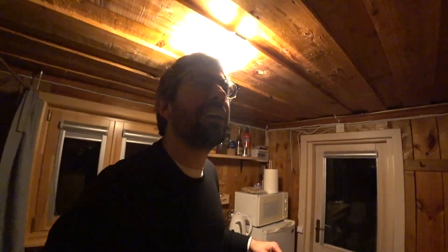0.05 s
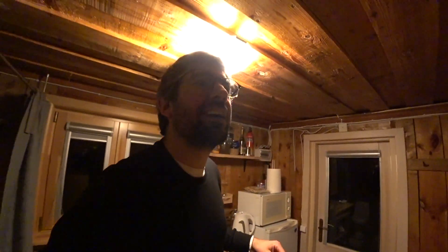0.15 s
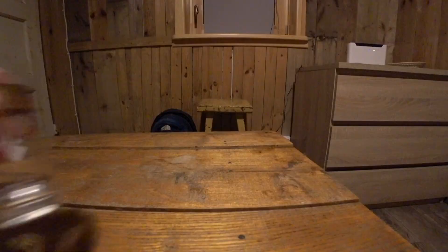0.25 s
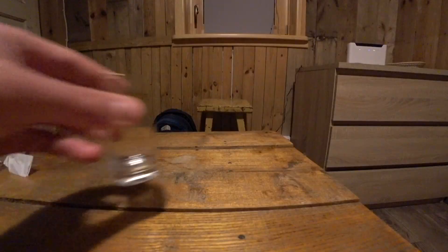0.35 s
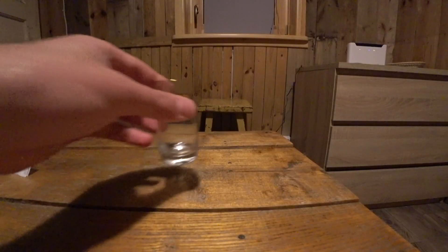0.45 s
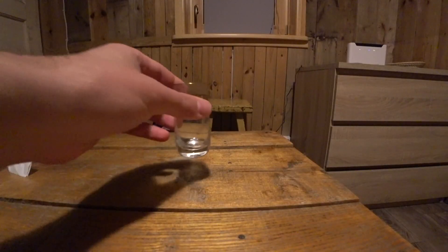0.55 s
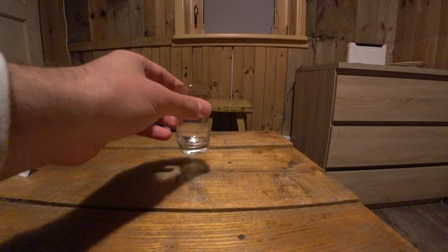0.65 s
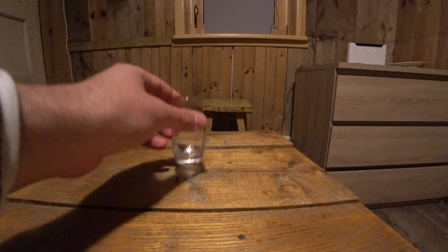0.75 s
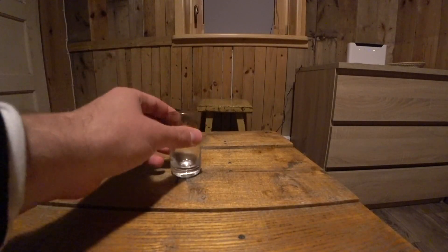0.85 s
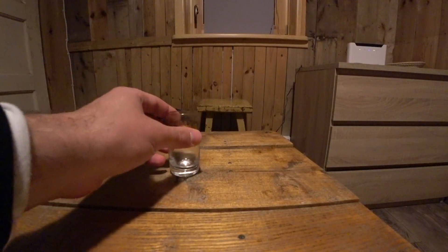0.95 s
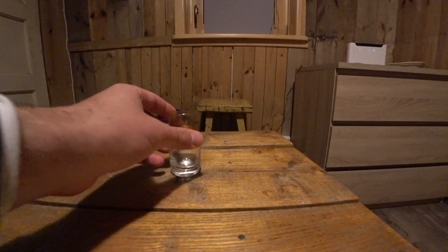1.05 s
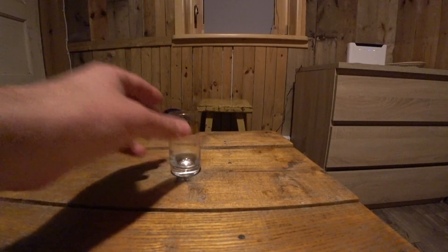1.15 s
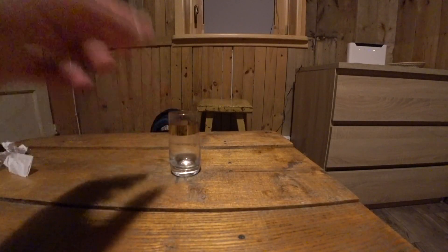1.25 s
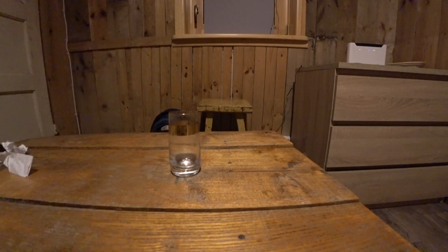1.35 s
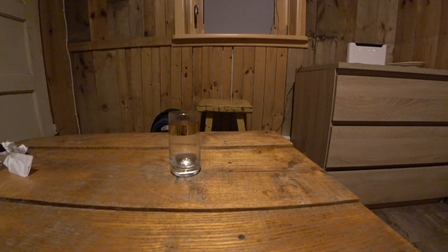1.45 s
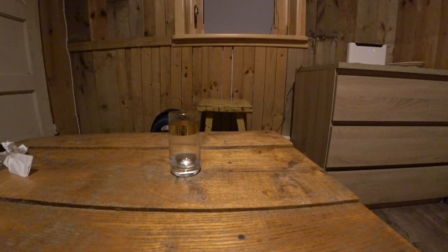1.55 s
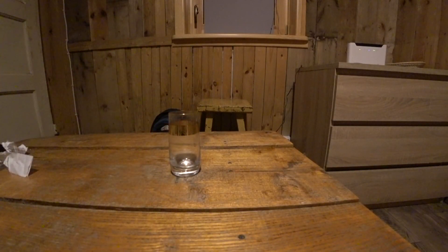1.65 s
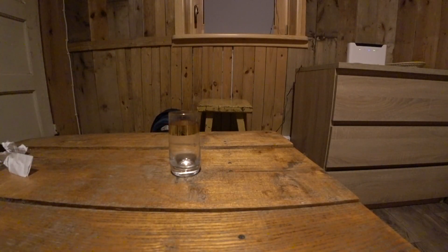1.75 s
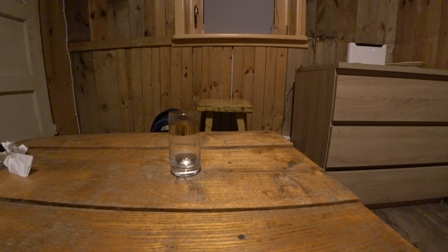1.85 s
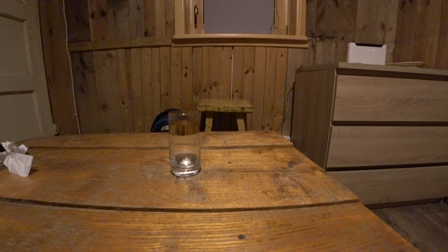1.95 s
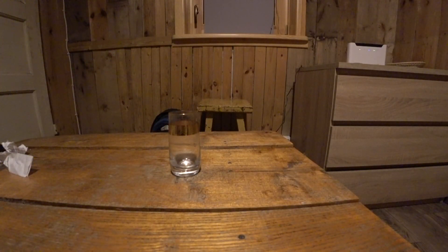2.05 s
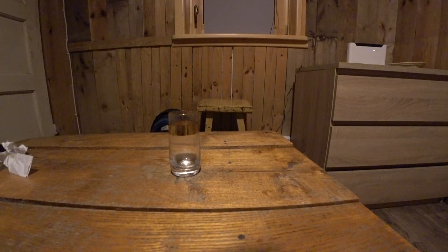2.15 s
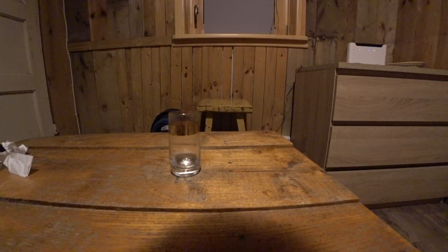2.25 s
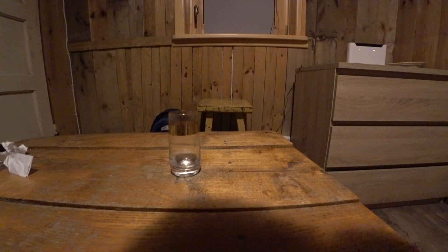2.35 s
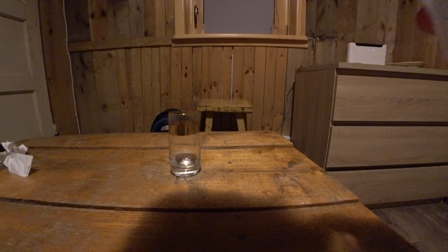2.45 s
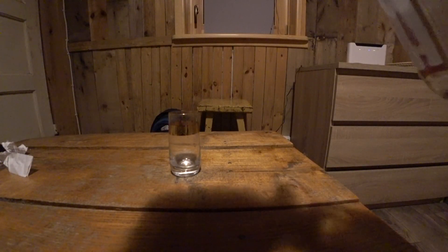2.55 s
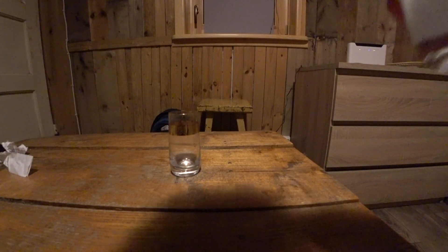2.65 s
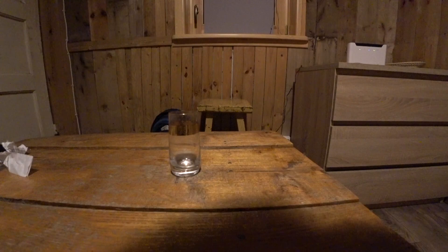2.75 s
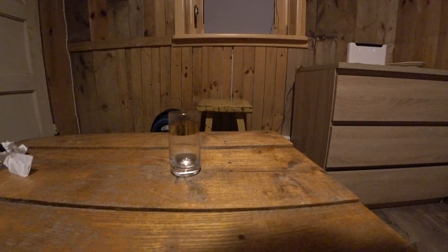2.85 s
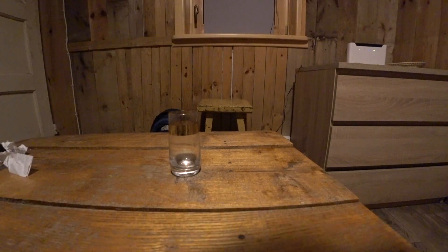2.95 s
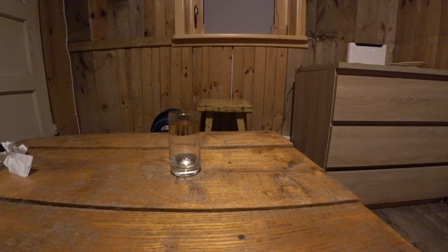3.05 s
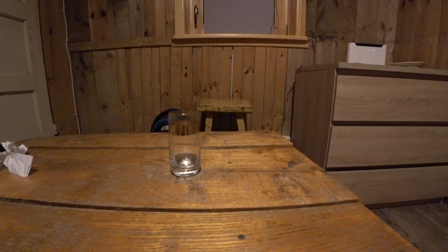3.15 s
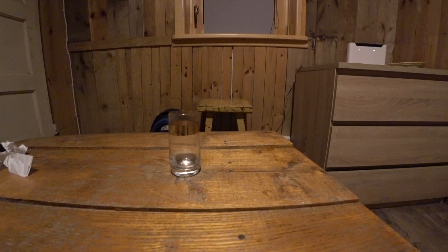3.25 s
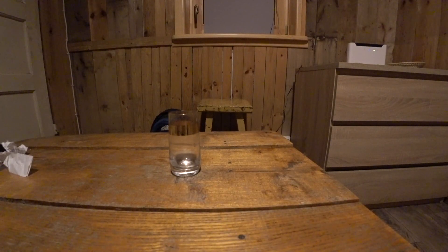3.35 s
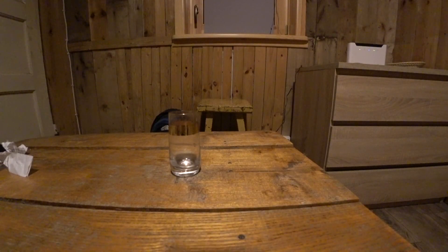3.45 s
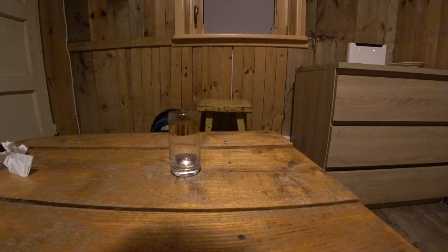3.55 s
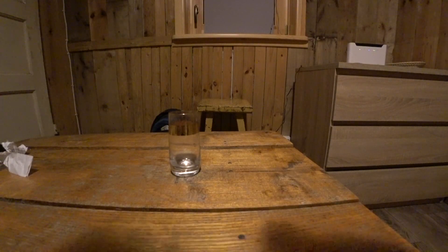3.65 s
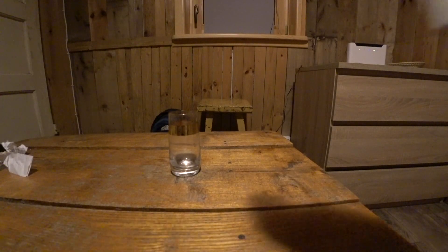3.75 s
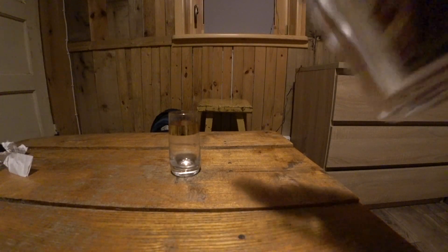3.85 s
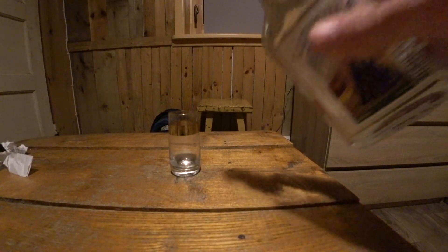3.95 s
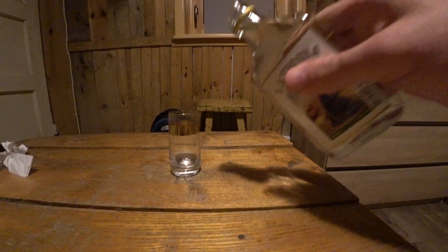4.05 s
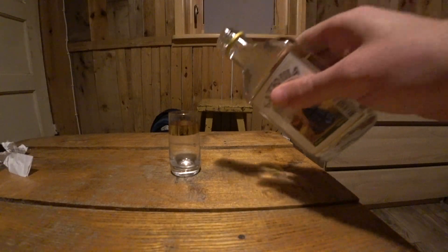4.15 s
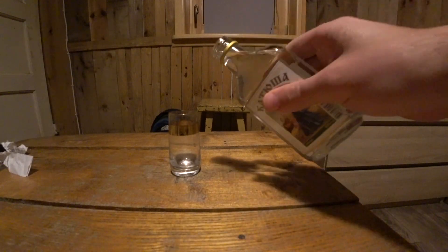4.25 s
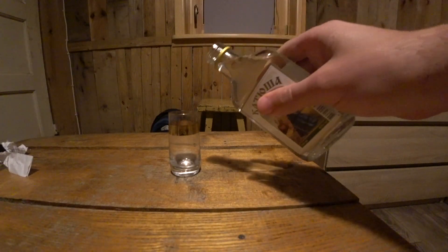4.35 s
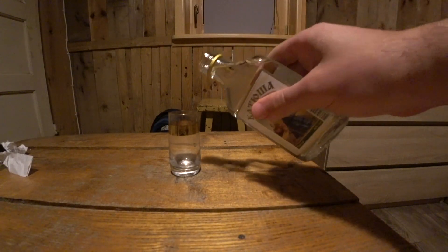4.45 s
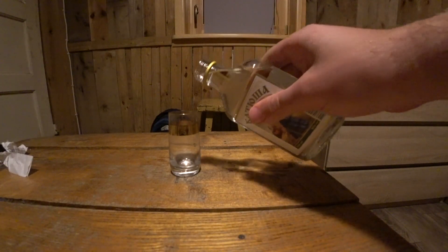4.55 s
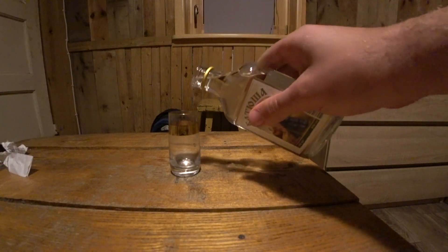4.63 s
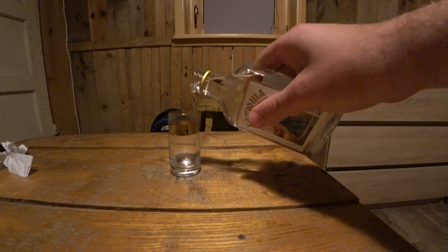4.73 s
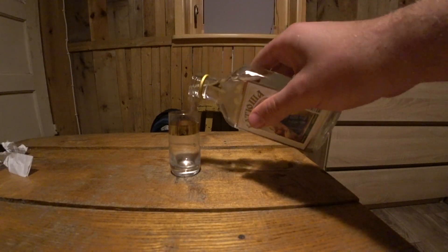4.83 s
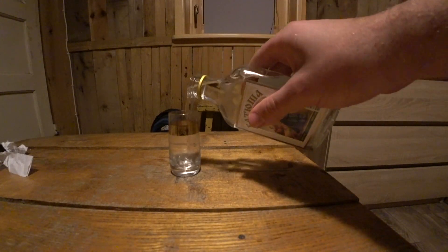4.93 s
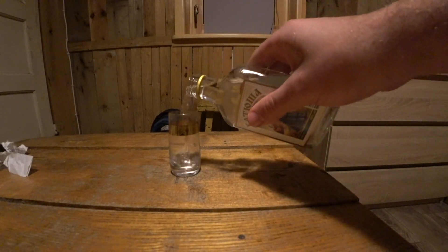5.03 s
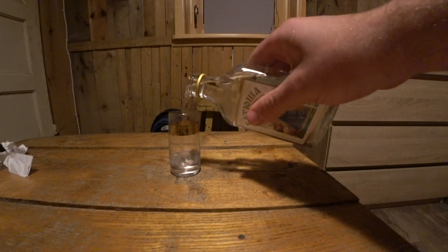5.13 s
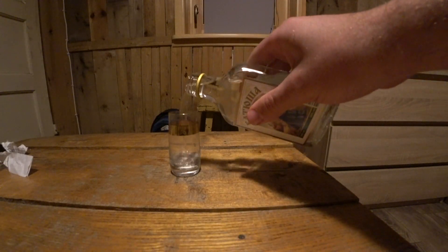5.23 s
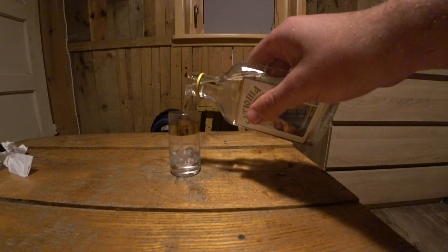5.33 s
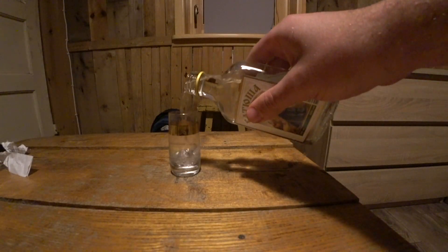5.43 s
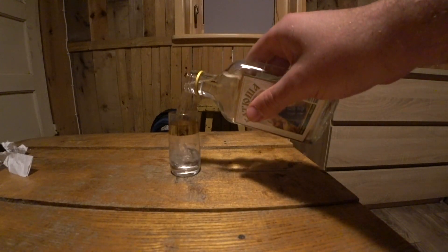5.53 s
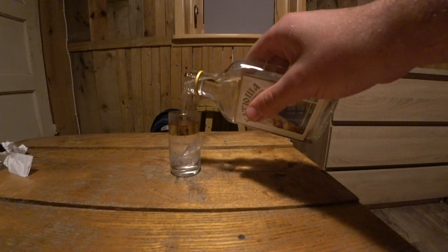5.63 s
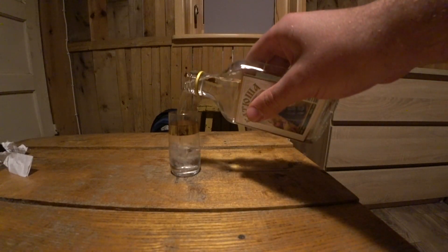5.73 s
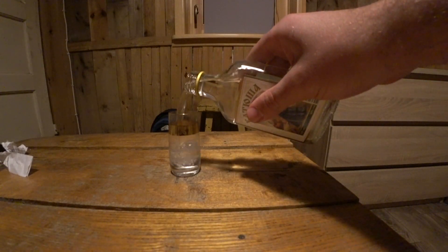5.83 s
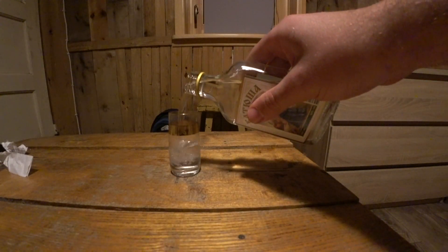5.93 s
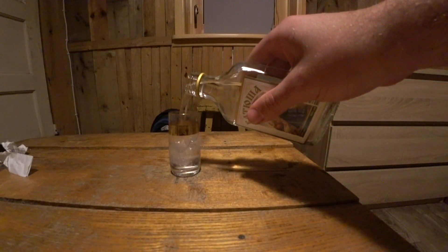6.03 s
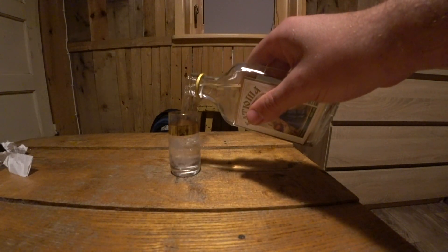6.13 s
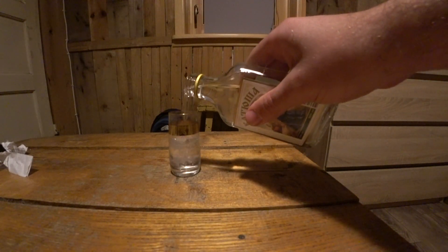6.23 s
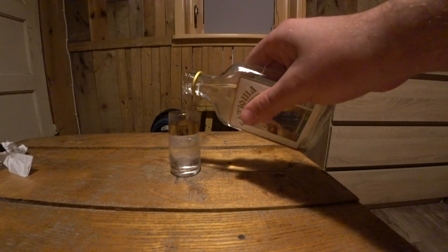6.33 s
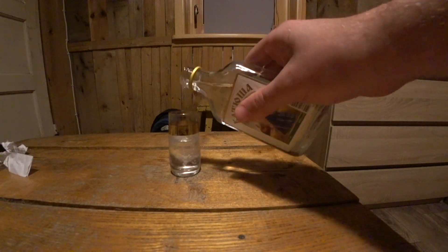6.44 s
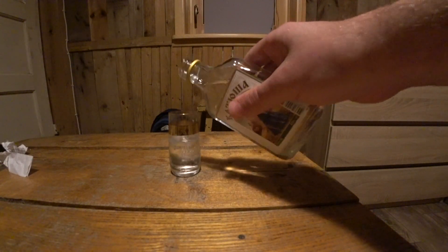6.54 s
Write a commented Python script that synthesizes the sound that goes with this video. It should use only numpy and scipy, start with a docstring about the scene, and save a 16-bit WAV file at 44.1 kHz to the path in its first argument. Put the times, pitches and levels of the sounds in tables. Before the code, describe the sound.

A sharp woody thump of glass on table, then faint bumps and quiet. Small metallic ticks lead to a bright crackling snap as a bottle cap's seal breaks, followed by gritty thread rubs and a hollow pop as it comes free. After a pause, round glugs accompany spurting, fizzy liquid in a small glass, ending in a few drips. Near microphone, short wooden room reflections, faint hush.

```python
"""A quarter second of louder, duller tone from another place is cut off; then, in a quiet panelled room, a small glass is
set on a wooden table: planks ring as decaying sines over noise, and the glass wall sings. A screw cap rubs, cracks its
seal and is twisted off: noise in metal, thread and neck resonances. The bottle gulps air, each gulp a hum that sweeps up,
and spurts of drink fall into the glass as bubble tones and noise in an air column that rises in pitch. The walls answer
cap, gulps and drink."""
import sys
import numpy as np
from scipy import signal
from scipy.fft import rfft, irfft, next_fast_len
from scipy.io import wavfile
from scipy.ndimage import uniform_filter1d, map_coordinates

SR = 44100
rng = np.random.default_rng(int(sys.argv[2]) if len(sys.argv) > 2 else 0)


def wav_record(signal):
    """Record a signal, one row per channel, as 16-bit PCM in the file named by sys.argv[1]."""
    frames = np.transpose(np.atleast_2d(signal))
    bounded = np.clip(frames, -1, 1)
    # unit amplitude maps onto the largest positive 16-bit level
    quanta = np.round(bounded * 32767).astype(np.int16)
    wavfile.write(sys.argv[1], SR, quanta)


N = 290525

# low modes of the cap's thin shell: f/Hz, width/Hz, relative level/dB
SHELL_MODES = [(1730, 720, 8), (2232, 560, 16)]
# modes of the rubbing thread: f/Hz, width/Hz, relative level/dB
THREAD_MODES = [(3290, 160, -4.5), (4000, 200, 2), (5380, 280, -7), (6280, 300, -7.5), (7800, 47, -4.5),
                (10356, 2900, -19)]
# strokes of the cap on its thread: start/s, length/s, low modes level/dB, thread level/dB, hollow level/dB
STROKES = [(1.853, .14, -82.5, -73, -98), (2.026, 0.23, -71.5, -68.5, -100), (2.29, 0.017, -60, -51.5, -95),
           (2.511, .05, -55.5, -59.5, -95), (2.6, 0.0618, -53.5, -58, -95),
           (2.713, 0.019, -65.5, -59, -105), (2.893, .04, -71.5, -61, -101.5),
           (2.977, 0.029, -59.5, -52, -65.5), (3.031, 0.0063, -44.5, -45, -60.5),
           (3.086, .01, -76, -73.5, -58.5), (3.212, 0.037, -69, -70, -63), (3.313, 0.05, -55, -56.5, -56),
           (3.385, .015, -67, -63.5, -52), (3.42, .01, -59, -56, -52), (3.429, 0.0052, -56.5, -46.5, -49),
           (3.465, 0.0088, -76.5, -73, -68)]
GRIP_S, SLIP_S = 0.004, 0.018  # a stroke takes this long to gain and to lose 10 dB


def landings():
    """Lumps of drink ring the air column as damped bubble tones; small drops click higher up, with a splat of noise."""
    # lumps landing in the glass: t/s, level/dB, f/Hz
    plops = [(5.086, -41, 1276), (5.256, -35, 1252), (5.295, -41.5, 1250), (5.305, -35, 1193),
             (5.321, -26.5, 1272), (5.354, -43, 1030), (5.412, -34.5, 1370), (5.441, -22, 1367),
             (5.48, -37, 1210), (5.502, -33.5, 1285), (5.526, -36, 1220), (5.547, -31, 1280),
             (5.597, -36, 984), (5.649, -45, 1800), (5.665, -29.5, 1446), (5.7, -26.5, 1414),
             (5.734, -33, 1400), (5.79, -37, 1630), (5.802, -34.5, 1360), (5.824, -34, 1403),
             (5.938, -36.5, 1580), (5.958, -36, 1530), (6.014, -37.5, 1640), (6.044, -38, 1590),
             (6.172, -58, 1730), (6.186, -45, 1760), (6.526, -46, 1790), (6.576, -41.5, 1840)]
    # small bubbles and drops: t/s, level/dB, f/Hz
    drops = [(4.089, -48, 3080), (4.576, -44, 3660), (4.773, -47, 3950), (4.945, -47.5, 3760),
             (4.974, -35, 5700), (4.984, -48, 5900), (5.0856, -48.5, 6800), (5.1254, -34, 3880),
             (5.1895, -38, 4060), (5.256, -38.5, 4130), (5.3109, -48, 4100), (5.316, -29.5, 3930),
             (5.3689, -41.5, 4400), (5.3916, -40.5, 4100), (5.415, -44, 3980), (5.4397, -38, 4000),
             (5.5204, -47, 5570), (5.535, -39.5, 4200), (5.5666, -32.5, 5740), (5.5782, -24.5, 4190),
             (5.632, -28.5, 4180), (5.6499, -36, 4310), (5.698, -40, 4370), (5.7698, -43, 4830),
             (5.791, -35.5, 4740), (5.8155, -31, 5920), (5.8703, -34, 4270), (5.9013, -38, 7700),
             (5.924, -26.5, 5340), (6.127, -48, 4100), (6.201, -41.5, 7740), (6.367, -37.5, 5570),
             (6.574, -42.5, 4630)]
    out, t = np.zeros(N), np.arange(300) / SR
    for s, db, hz in plops:
        add(out, s, amp(db + 0.5) * blip(hz, cycles=5.7, rise=0.0076, onset=9.5))
    for s, db, hz in drops:
        add(out, s, amp(db - 1.0) * blip(hz, cycles=9.2, rise=0.013))
        bright_noise = np.diff(rng.standard_normal(len(t) + 2), 2)
        add(out, s, amp(db - 14 - 60 * t / .006) * bright_noise)
    return out


def squeak():
    """A tiny bubble leaves the lip: a short sine that glides upward."""
    # one bubble: t/s, level/dB, from f/Hz, to f/Hz, length/s
    lip_bubble = (4.969, -38, 3500, 8600, .01)
    out = np.zeros(N)
    s, db, low_hz, top_hz, length = lip_bubble
    u = np.arange(round(length * SR)) / SR / length
    cycles = length * u * (low_hz + (top_hz - low_hz) * u / 2)
    add(out, s, amp(db) * np.sin(np.pi * u) * np.sin(2 * np.pi * cycles))
    return out


def fizzing():
    """Fizz is a spray of very short bubble tones over fine hiss, coloured and held at an even slow level."""
    # colour of the fizz: f/Hz, relative level/dB
    fizz_colour = [(1800, 3), (3200, -11.5), (4200, -4), (6000, -1), (9000, -3), (11500, 1.5)]
    mist = .3  # hiss rms beside a spray of rms 1
    spray = np.zeros(N)
    draws = rng.random(1600), rng.exponential(size=1600), *rng.standard_normal((2, 1600))
    for u, size, spread, life in zip(*draws):
        hz = min(6000 * np.exp(.4 * spread), 11000)
        add(spray, 4.9 + 1.7 * u, amp(4 * size) * blip(hz, cycles=2 * np.exp(.7 * life), rise=.05))
    raw = unit(spray) + mist * rng.standard_normal(N)
    fizz = filtered(raw, lambda f: amp(along(fizz_colour, f)))
    # level it, so that the spurts alone set the slow level
    return fizz / (np.sqrt(np.abs(uniform_filter1d(fizz ** 2, size=4000))) + 1e-9)


def spurts():
    """Each spurt gurgles in the shortening air column, fizzes, drums the table and stirs the wet glass wall."""
    # spurts of drink: start/s, length/s, air column level/dB, fizz level/dB, table level/dB
    spurt_rows = [(4.973, 0.0105, -68, -58, -63), (5.105, 0.0046, -63, -62.5, -76),
                  (5.13, 0.028, -67, -50, -75), (5.17, 0.012, -71, -60, -69),
                  (5.261, 0.0033, -53, -51, -66), (5.283, 0.03, -60, -70, -64),
                  (5.321, 0.0105, -47, -48.5, -59.5), (5.441, 0.0073, -42.5, -49, -54),
                  (5.495, 0.032, -52, -64, -64), (5.556, 0.013, -56, -50.5, -59),
                  (5.593, 0.0079, -53.5, -70.5, -57.5), (5.662, 0.009, -65, -47.5, -48),
                  (5.716, 0.055, -49, -60.5, -56), (5.811, 0.0054, -47.5, -51, -45),
                  (5.894, 0.013, -53, -48.5, -58), (5.927, 0.022, -51.5, -55, -53),
                  (5.97, 0.049, -54.5, -66, -61.5), (6.03, 0.024, -56, -64.5, -62),
                  (6.178, 0.042, -58.5, -71, -67.5), (6.256, .012, -53, -61, -57.5),
                  (6.521, 0.0062, -67, -66, -61.5), (6.585, .01, -54, -72, -57.5)]
    # time to gain 10 dB: air column/s, fizz/s, table/s
    gush_s = (0.013, 0.011, 0.0071)
    # time to lose 10 dB: air column/s, fizz/s, table/s
    drain_s = (0.051, .02, 0.047)
    # the air column shortens: t/s, f/Hz
    column_pitch = [(4.95, 1145), (5.3, 1238), (5.7, 1450), (6.0, 1640), (6.3, 1843), (6.59, 1850)]
    # the planks under the stream: f/Hz, width/Hz, relative level/dB for each of two passes
    plank_modes = [(497.8, 63, 0.5), (648, 60, 1), (830, 115, -1.5)]
    wall_hz, load_hz_per_s = 3560, 70  # wall pitch at 0 s, and its fall as the drink loads it
    s, length, *dbs = np.transpose(spurt_rows)
    gurgle, hiss, drum = (swells(s, length, *row) for row in zip(dbs, gush_s, drain_s))
    hz = glide(column_pitch)
    fizz = fizzing()
    rumble = lumps(80, 3) * rng.standard_normal(N)
    planks = unit(filtered(rumble, lambda f: modes(plank_modes)(f) ** 2))
    column = amp(-3) * gurgle * moving(hz, 280, lumps(110, 4.5))
    overtone = amp(-8) * hiss * moving(3.15 * hz, 300, lumps(70, 4))
    wall = moving(wall_hz - load_hz_per_s * np.arange(N) / SR, 30, 1)
    sung = amp(-18) * uniform_filter1d(gurgle, size=6000) * wall
    return column + overtone + hiss * fizz + drum * planks + sung


def pour():
    """Drink falls into the glass: bubble tones of lumps and drops, one squeak at the lip, and the noisy spurts."""
    return landings() + squeak() + spurts()


def gulps():
    """The neck opens with a pop; the entering bubble hums low, then sweeps up as it pinches off."""
    # air gulps: start/s, pinch-off t/s, hum f/Hz, top f/Hz, hum level/dB, peak level/dB, pop level/dB
    gulp_rows = [(4.089, 4.226, 172, 605, -63, -56.5, -56), (4.577, 4.757, 114.4, 501, -61, -47, -46.5),
                 (4.777, 4.946, 94.4, 578, -63, -36.5, -47), (4.969, 5.15, 81.2, 478, -62, -31.5, -42),
                 (5.18, 5.358, 69.4, 465, -64, -31, -46), (5.459, 5.59, 57.8, 399, -63, -36.5, -90)]
    settle, settle_s, jolt_db = 0.15, 0.01, 13.5  # starts sharp (log pitch) and louder, then settles
    creep_per_s = 1.23  # slow climb in log pitch
    sweep_lead_s, sweep_s = 0.0189, 0.012  # the sweep's middle before the peak, and its width
    swell_s, pinch_s = 0.015, 0.0087  # the peak gains and loses 10 dB in these times
    out, t = np.zeros(N), np.arange(600) / SR
    pop = (1 - t / 0.00067) * np.exp(-t / 0.00051) * (1 - np.exp(-t / 0.00045))
    for s, pinch, hum_hz, top_hz, hum_db, peak_db, pop_db in gulp_rows:
        u = np.arange(round((pinch - s + .06) * SR)) / SR
        late = u - (pinch - s)  # seconds after pinch-off
        sweep = 1 / (1 + np.exp(-(late + sweep_lead_s) / sweep_s))
        low = np.log(hum_hz) + settle * np.exp(-u / settle_s) + creep_per_s * u
        hz = np.exp(low + sweep * (np.log(top_hz) - low))
        hum = amp(hum_db + jolt_db * np.exp(-u / settle_s / 2) - 10 * np.maximum(late, 0) / pinch_s)
        peak = amp(peak_db - 10 * np.maximum(-late / swell_s, late / pinch_s))
        fade_in = np.minimum(u / 0.0027, 1)
        add(out, s, (hum + peak) * fade_in * np.sin(2 * np.pi * np.cumsum(hz) / SR))
        add(out, s, amp(pop_db + 19.5) * pop)
    return out


def cracks(loose_s):
    """Each crack or tick is a noise burst ringing thin metal, with a knock in the neck's air."""
    # cracks and ticks: t/s, low modes level/dB, high modes level/dB, neck level/dB
    crack_rows = [(2.119, -48.5, -76, -86), (2.1326, -43.5, -83, -79), (2.185, -39.5, -64, -54),
                  (2.2414, -47, -47.5, -60), (2.2596, -50.5, -50.5, -77), (2.276, -46.5, -52.5, -79),
                  (2.2841, -42, -29.5, -52), (2.3013, -31, -29.5, -47.5), (2.3672, -45, -45, -69),
                  (2.3925, -21, -15.5, -57), (2.3988, -12, -7, -47), (2.4099, -25.5, -12, -69),
                  (2.4157, -28.5, -11, -54), (2.4278, -24.5, -8, -49.5), (2.4892, -11, -5.5, -30),
                  (2.5737, -27.5, -48, -64), (2.599, -44, -40.5, -56), (2.638, -35.5, -48, -53.5),
                  (2.7119, -43, -50, -51.5), (2.9765, -39, -48.5, -68), (3.047, -34.5, -52, -71),
                  (3.0742, -54.5, -32, -53), (3.1658, -36, -49.5, -79), (3.2087, -66, -43.5, -64),
                  (3.2355, -42.5, -40.5, -61), (3.3143, -40.5, -53, -72), (3.3857, -33, -36, -75),
                  (3.3899, -27.5, -28.5, -52), (3.4237, -42, -48, -74), (3.4295, -33, -37.5, -71),
                  (3.4338, -24.5, -25, -54.5), (3.469, -54, -40, -64)]
    # high modes of the cap: f/Hz, width/Hz, relative level/dB
    cap_modes = [(4006, 170, -8.5), (4600, 400, -7), (5480, 120, 2.5), (6500, 960, -4), (8360, 330, 1),
                 (8800, 2600, -6.5), (12100, 500, -3.5)]
    # the air in the bottle neck: f/Hz, width/Hz, relative level/dB
    neck_modes = [(487, 36, 0.5), (960, 250, -12.5)]
    out, t = np.zeros(N), np.arange(2000) / SR
    for s, shell_db, bright_db, neck_db in crack_rows:
        burst = amp(-60 * t / 0.0096) * (1 - np.exp(-t / 0.00011)) * rng.standard_normal(len(t))
        shell = filtered(burst, thin(SHELL_MODES))
        # a loose cap rattles on the thread
        bright = filtered(burst, thin(THREAD_MODES if s > loose_s else cap_modes))
        neck = filtered(burst, modes(neck_modes))
        for db, part in ((shell_db, shell), (bright_db, bright), (neck_db + 3.5, neck)):
            add(out, s, amp(db) * part / np.abs(part).max())
    return out


def rubs():
    """Strokes of gritty noise rub the cap on its thread and sound its shell."""
    grit = lumps(200, 2.5) * rng.standard_normal(N)
    s, length, low_db, high_db, _ = np.transpose(STROKES)
    low = swells(s, length, low_db, GRIP_S, SLIP_S)
    high = swells(s, length, high_db, GRIP_S, SLIP_S)
    return low * unit(filtered(grit, thin(SHELL_MODES))) + high * unit(filtered(grit, thin(THREAD_MODES)))


def hollow():
    """The air between cap and mouth is knocked and rubbed; its resonance moves, mostly upward, as it opens."""
    # the hollow opens up: t/s, f/Hz
    hollow_pitch = [(2.97, 761), (3.07, 691.4), (3.3, 805), (3.385, 876), (3.437, 1596), (3.472, 1740),
                    (3.52, 1860)]
    # knocks of the hollow: t/s, level/dB
    puffs = [(3.05, -44), (3.073, -40.5), (3.314, -46), (3.388, -42), (3.4351, -21), (3.47, -32)]
    out = np.zeros(N)
    s, length, _, _, hollow_db = np.transpose(STROKES)
    gain = swells(s, length, hollow_db, GRIP_S, SLIP_S)
    hz = glide(hollow_pitch)
    for s, db in puffs:
        add(out, s, amp(db) * blip(hz[round(s * SR)], cycles=3.6, rise=0.0084))
    return out + gain * moving(hz, 130, lumps(90, 2))


def cap(loose_s):
    """The cap's cracks, its rubbing on the thread and the hollow under it."""
    return cracks(loose_s) + rubs() + hollow()


def knocks():
    """Each contact of the glass rings the planks; a soft one stirs only the low modes."""
    # the glass meets the table: t/s, level/dB, sharpness f/Hz, left minus right/dB, damping by the hand/(dB/s)
    contacts = [(.807, -2, 8920, 0.5, 15), (.935, -25, 616, 4, 200), (1.023, -21, 910, 0.5, 150)]
    # plank modes: f/Hz, relative level/dB, t60/s
    table_modes = [(165, -24, 0.49), (262, -40, 0.97), (488, -19, 0.22), (555, -15, 0.13),
                   (645.4, -8, 0.21), (755, -17, .16), (826, -13, 0.19), (898, -21, 0.12),
                   (1111, -19, 0.15), (1201, -21, 0.21), (1432, -15, .18), (2040, -23.5, 0.14),
                   (2065, -22, 0.18), (2556, -20.5, .2)]
    # colour of the dense thud: f/Hz, relative level/dB
    thud_colour = [(35, -63), (60, -33), (129, -37.5), (164, -15.5), (199, -37.5), (295, -10), (391, -27.5),
                   (646, -10), (877, -11), (1420, -14.5), (1720, -17), (2050, -9), (11000, -66.5),
                   (14300, -100), (22000, -120)]
    # decay of the thud: f/Hz, t60/s
    thud_t60 = [(150, 0.093), (650, 0.23), (2000, 0.27), (5000, 0.23), (10000, 0.95)]
    build_cycles, waver_db = 2.7, 2.5  # a mode builds up over some cycles and wavers at random
    held_s, held_db_per_s = .125, 114  # after a moment the hand holds the glass and the ring dies faster
    out, t = np.zeros((2, N)), np.arange(SR // 2) / SR
    for s, db, sharp_hz, pan_db, damp_db in contacts:
        ring = 0
        for hz, level, t60 in table_modes:
            build = 1 - np.exp(-t * hz / build_cycles)
            waver = lumps(28, waver_db)[:len(t)]
            ring = ring + amp(level - 60 * t / t60) * build * waver * np.sin(2 * np.pi * hz * t)
        dense = unit(filtered(dying(thud_t60), lambda hz: amp(along(thud_colour, hz))))[:, :len(t)]
        click = amp(-25.0 - 60 * t / 0.0069) * rng.standard_normal(len(t))
        blow = (amp(-0.5) * ring + amp(-25.5) * dense) * (1 - np.exp(-t / 0.00033)) + click
        soft = signal.butter(4, min(sharp_hz, SR / 3), fs=SR, output="sos")
        damping = damp_db * t + held_db_per_s * np.maximum(t - held_s, 0)
        add(out, s, amp(db - damping) * pan(pan_db) * signal.sosfilt(soft, blow))
    return out


def glass():
    """The wall of the glass sings faintly in decaying sines; its close pair beats."""
    # wall modes: f/Hz, relative level/dB, t60/s
    glass_modes = [(3194, 0, .7), (3203, -1, .7), (5173, -10, .6), (8942, -18, .25)]
    # moments when it rings: t/s, level/dB
    rings = [(1.011, -62.5), (6.53, -70), (6.572, -67)]
    out, t = np.zeros(N), np.arange(SR // 2) / SR
    for s, db in rings:
        for hz, level, t60 in glass_modes:
            add(out, s, amp(db + level - 60 * t / t60) * np.sin(2 * np.pi * hz * t))
    return out


def room(x):
    """Wooden walls answer after 4 ms with decaying noise, drawn afresh for each quarter second of sound."""
    # decay of the room: f/Hz, t60/s
    room_t60 = [(200, 0.23), (2000, 0.22), (10000, 0.19)]
    out, step = np.zeros((2, N)), SR // 4
    for k in range(0, N, step):
        add(out, k / SR + 0.004, signal.fftconvolve(x[None, k:k + step], dying(room_t60), axes=1))
    return out


def room_tone():
    """Coloured stereo noise: the louder, duller tone of another place is cut off and leaves this room's hush."""
    # colour of the early tone: f/Hz, relative level/dB
    early_colour = [(12, -25), (20, 8.5), (49, -15), (107, -2.5), (163, -15), (250, -21), (293, -4),
                    (383, -16), (1050, -18), (1200, -20), (1520, -19.5), (10600, -43), (11500, -34.5),
                    (15000, -87), (22000, -120)]
    # colour of the hush: f/Hz, relative level/dB
    hush_colour = [(12, -23), (20, -3.5), (151, -7.5), (318, -12.5), (426, -16), (513, -17.5), (805, -19.5),
                   (1140, -20.5), (1410, -22), (1990, -23), (10100, -32.5), (11500, -27), (15000, -68),
                   (22000, -120)]
    # width of the early tone: f/Hz, side minus middle/dB
    early_side = [(60, -28), (220, -12), (830, -4), (3110, -4), (11600, -4)]
    # width of the hush: f/Hz, side minus middle/dB
    hush_side = [(60, -16), (170, -8), (490, 6), (1410, 8.5), (4050, 1.5), (11600, -2.5)]
    early_db, hush_db = -48.5, -64
    early = np.clip((.256 - np.arange(N) / SR) / 0.011, 0, 1)
    loud = early * amp(early_db) * tone(early_colour, early_side)
    return loud + (1 - early) * amp(hush_db) * tone(hush_colour, hush_side)


def amp(db):
    """Gain of a level in dB."""
    return 10 ** (np.asarray(db) / 20)


def unit(x):
    """Scales a sound to rms 1."""
    return x / np.sqrt(np.mean(x ** 2) + 1e-20)


def along(points, hz):
    """Reads (Hz, value) points on a log frequency axis."""
    f, v = np.transpose(points)
    return np.interp(np.log(hz + 1), np.log(f + 1), v)


def filtered(x, response):
    """Filters x by a complex response of frequency."""
    m = next_fast_len(x.shape[-1] + SR // 2)
    return irfft(rfft(x, m) * response(np.fft.rfftfreq(m, 1 / SR)), m)[..., :x.shape[-1]]


def modes(table):
    """The causal response of (Hz, width, dB) resonances, summed with alternating signs."""
    def response(f):
        return sum((-1) ** k * amp(db) * 1j * f * w / (c * c - f * f + 1j * f * w)
                   for k, (c, w, db) in enumerate(table))
    return response


def thin(table):
    """Resonances of a small object, which radiates little bass: a third-order low cut at 1400 Hz."""
    return lambda f: modes(table)(f) * (1j * f / 1400 / (1 + 1j * f / 1400)) ** 3


def add(x, s, sound):
    """Mixes a sound in at s seconds."""
    part = x[..., round(s * SR):][..., :sound.shape[-1]]
    part += sound[..., :part.shape[-1]]


def pan(db):
    """Left and right gains, db apart."""
    return amp([[db / 2], [-db / 2]])


def dying(t60s):
    """Stereo noise in which each frequency dies at its own speed; its middle has energy 1."""
    wide_db = -4  # side minus middle
    hz, t, z = signal.stft(rng.standard_normal((2, SR // 2)), SR, nperseg=256)
    decay = amp(-60 * t / along(t60s, hz)[:, None])
    mid, side = signal.istft(z * decay, SR, nperseg=256)[1]
    side = amp(wide_db) * side
    return np.array([mid + side, mid - side]) / np.linalg.norm(mid)


def tone(spectrum, wide):
    """Steady coloured stereo noise whose middle has rms 1."""
    noise = rng.standard_normal((2, N))
    mid, side = filtered(noise, lambda hz: amp(along(spectrum, hz) + [0 * hz, along(wide, hz)]))
    return np.array([mid + side, mid - side]) / mid.std()


def moving(hz, pole_hz, lumpy):
    """Noise under a lumpy gain in a resonance that follows hz: two low-passed noises on a quadrature carrier."""
    pole = np.exp(-2 * np.pi * pole_hz / SR)
    slow = signal.lfilter([1], [1, -2 * pole, pole ** 2], lumpy * rng.standard_normal((2, N)))
    turn = 2 * np.pi * np.cumsum(hz) / SR
    return unit(slow[0] * np.cos(turn) + slow[1] * np.sin(turn))


def lumps(rate, depth_db):
    """A smooth random gain with rate knots a second."""
    knots = rng.standard_normal(int(N * rate / SR) + 4)
    return amp(depth_db * map_coordinates(knots, [np.arange(N) * rate / SR]))


def blip(hz, cycles, rise, onset=8):
    """A bubble: a damped sine whose pitch climbs."""
    u = np.arange(int(7 * cycles / hz * SR)) / SR * hz / cycles
    return np.sin(2 * np.pi * cycles * u * (1 + rise * u)) * np.exp(-u) * (1 - np.exp(-u * onset))


def glide(rows):
    """One value per sample from (s, value) points."""
    return np.interp(np.arange(N) / SR, *np.transpose(rows))


def swells(starts, lengths, dbs, rise_s, fall_s):
    """Gain of events that rise, hold and fall, 10 dB in rise_s and in fall_s; their powers add."""
    t, power = np.arange(N) / SR, np.full(N, 1e-7)
    for s, length, db in zip(starts, lengths, dbs):
        near = slice(max(round((s - .3) * SR), 0), round((s + length + .3) * SR))
        outside = np.maximum((s - t[near]) / rise_s, (t[near] - s - length) / fall_s)
        power[near] += amp(2 * db - 20 * np.maximum(outside, 0))
    return np.sqrt(power - 1e-7 + 1e-14)


def scene():
    """Pans the sources and adds the walls' answer and the room tone."""
    loose_s, loose_wet_db = 2.9, -5  # free of its ring and shielded by the hand, the cap stirs the walls less
    lid, drink, air = cap(loose_s), pour(), gulps()
    near = knocks() + glass() + pan(-0.99) * lid + pan(1.1) * drink + pan(0.3) * air
    lid_send = amp(-7 + loose_wet_db * (np.arange(N) / SR > loose_s)) * lid
    return near + room(lid_send + amp(-11.5) * drink + amp(-16.5) * air) + room_tone()


def record(dry):
    """The treble steps down by 28 dB around the edge and ends at the top."""
    edge_hz, top_hz = 11100, 12250

    def response(hz):
        step = 1 / (1 + np.exp(np.clip((edge_hz - hz) / 60, -50, 50)))
        return amp(-28 * step) * (hz < top_hz)
    return filtered(dry, response)


dry = scene()
out = record(dry)
wav_record(out)
```